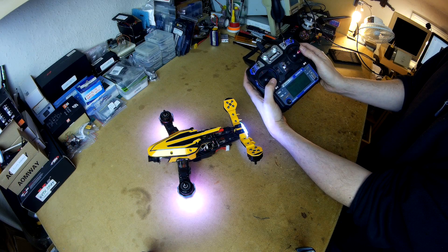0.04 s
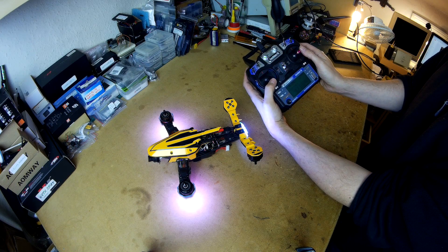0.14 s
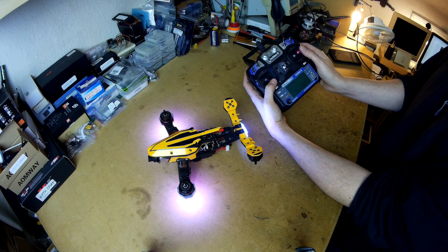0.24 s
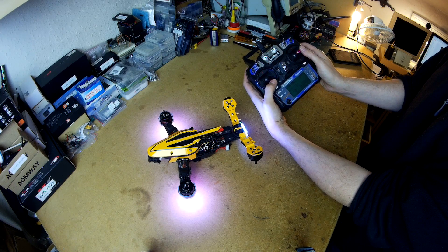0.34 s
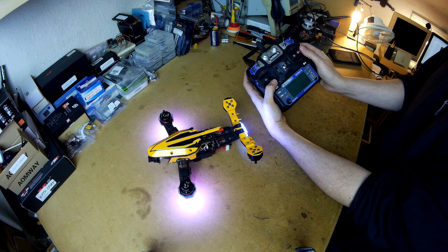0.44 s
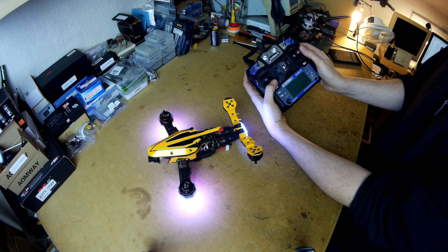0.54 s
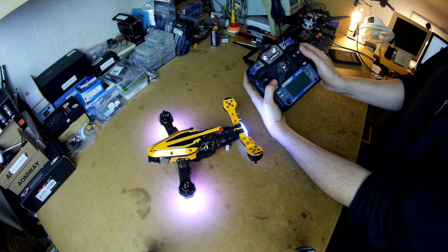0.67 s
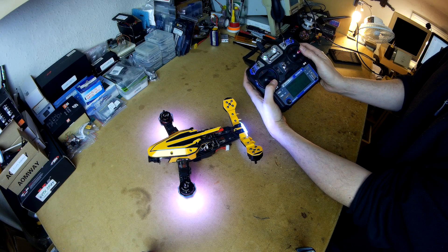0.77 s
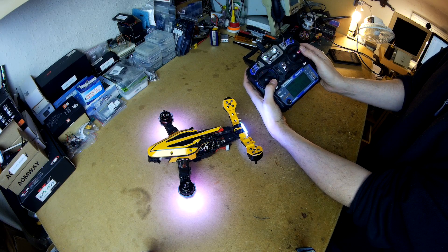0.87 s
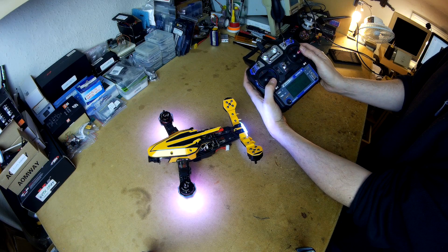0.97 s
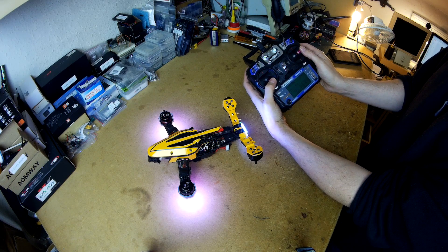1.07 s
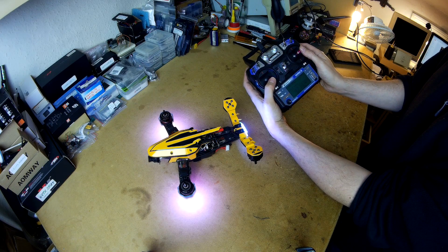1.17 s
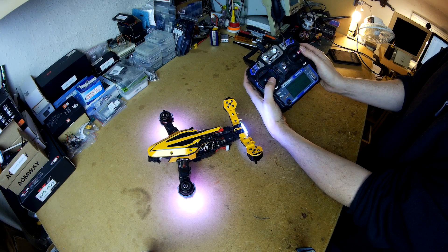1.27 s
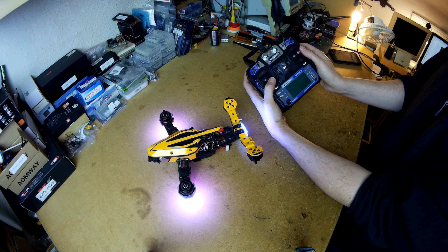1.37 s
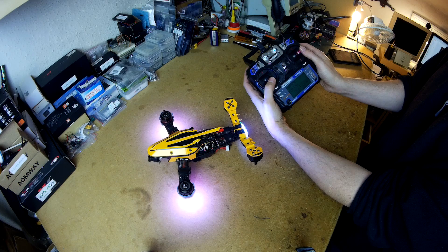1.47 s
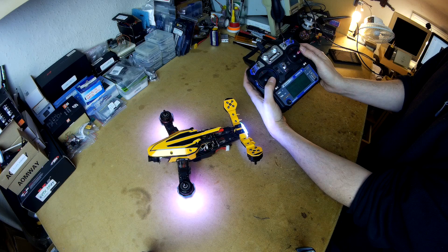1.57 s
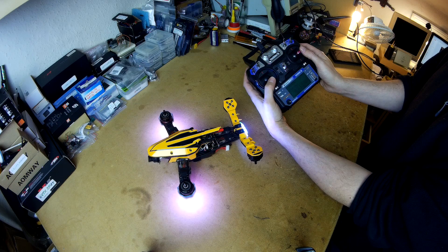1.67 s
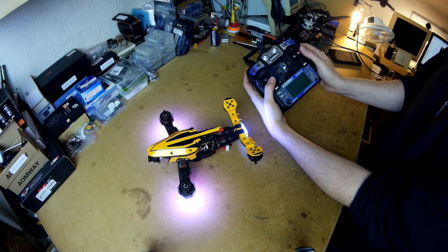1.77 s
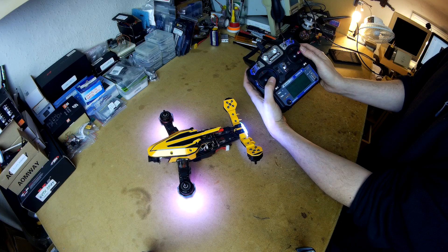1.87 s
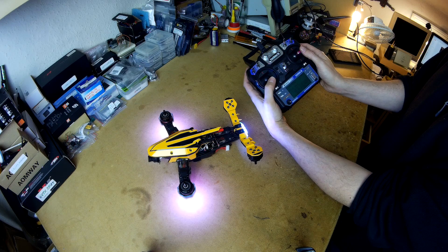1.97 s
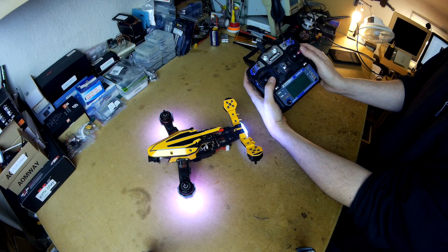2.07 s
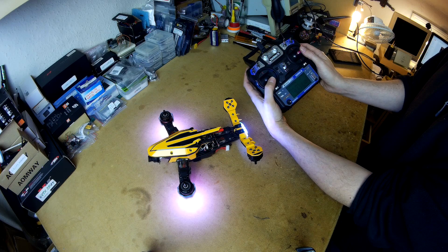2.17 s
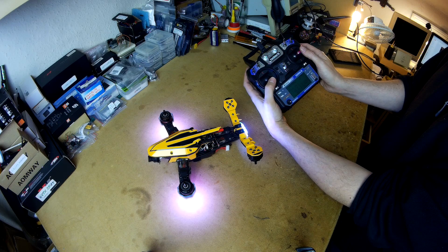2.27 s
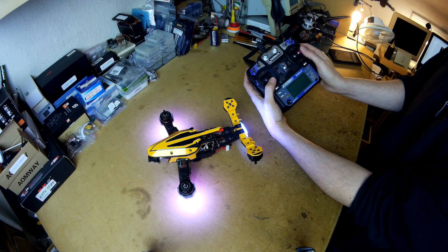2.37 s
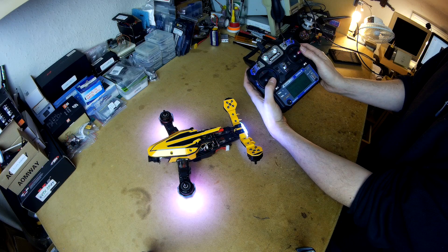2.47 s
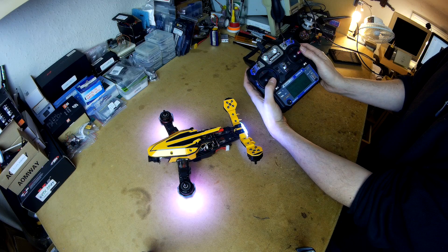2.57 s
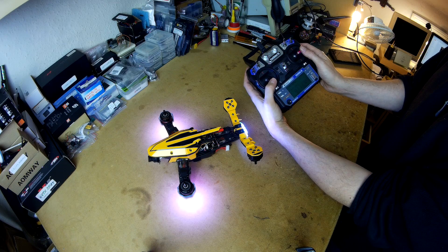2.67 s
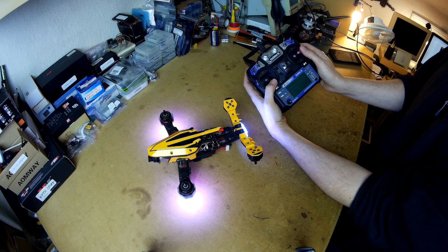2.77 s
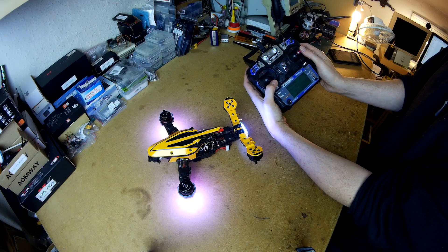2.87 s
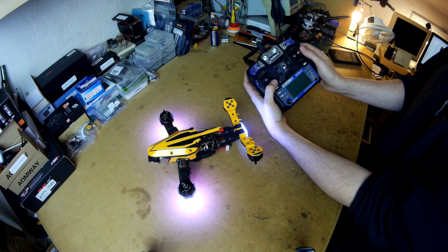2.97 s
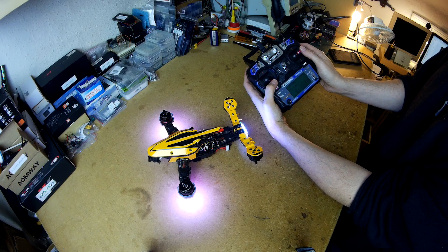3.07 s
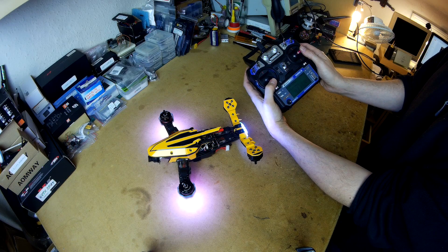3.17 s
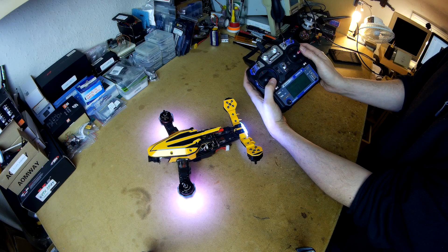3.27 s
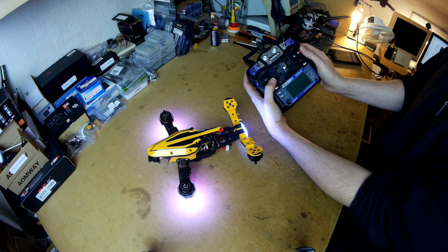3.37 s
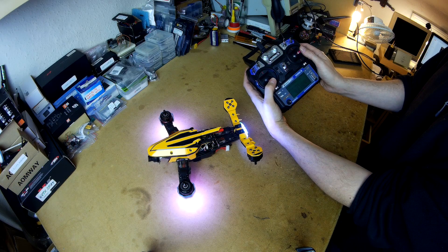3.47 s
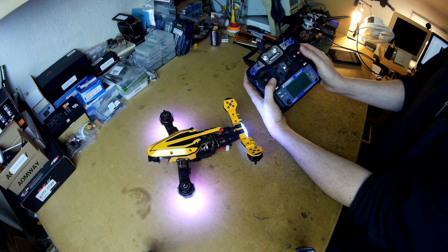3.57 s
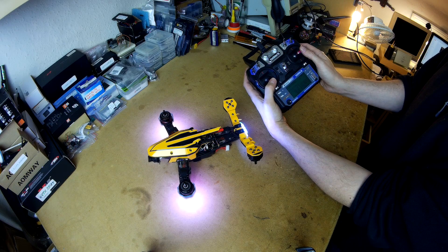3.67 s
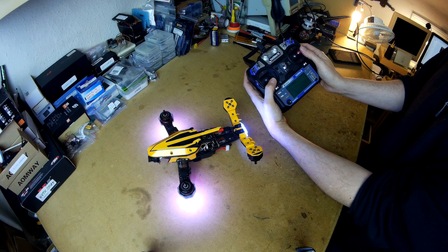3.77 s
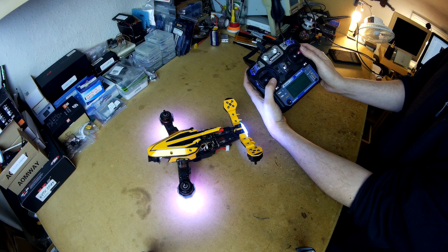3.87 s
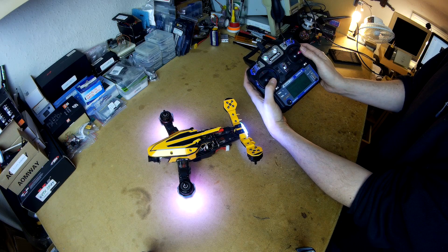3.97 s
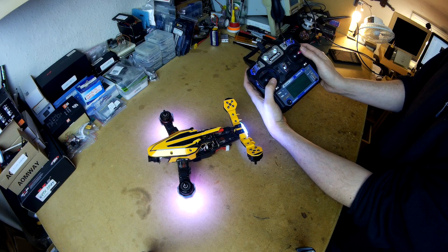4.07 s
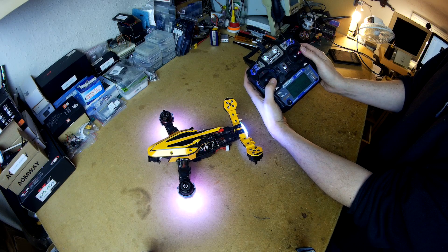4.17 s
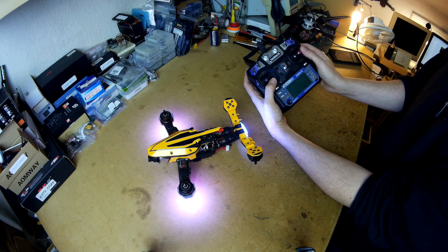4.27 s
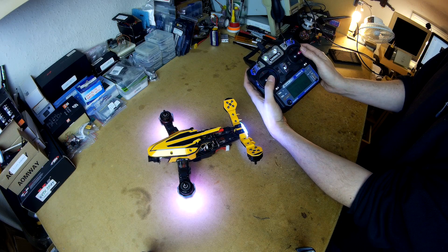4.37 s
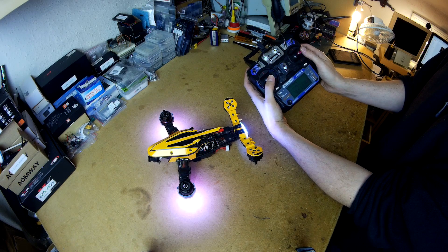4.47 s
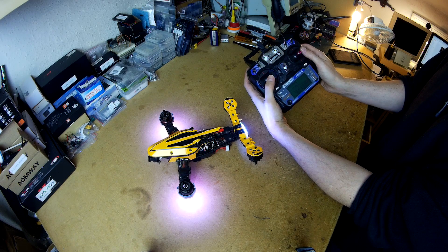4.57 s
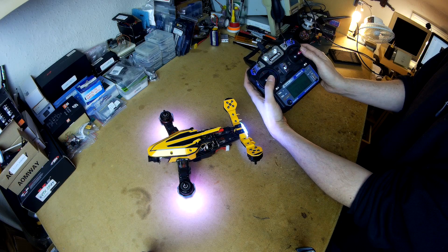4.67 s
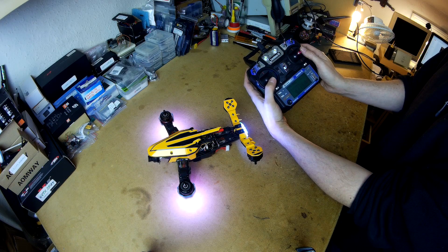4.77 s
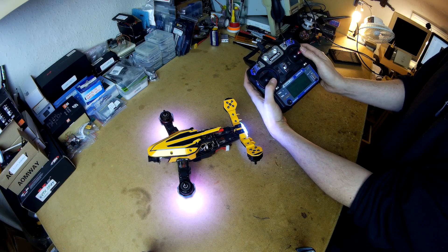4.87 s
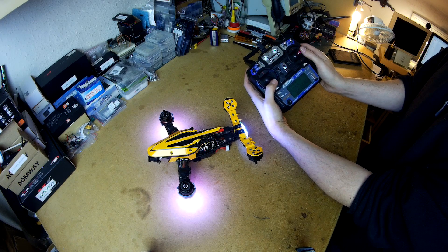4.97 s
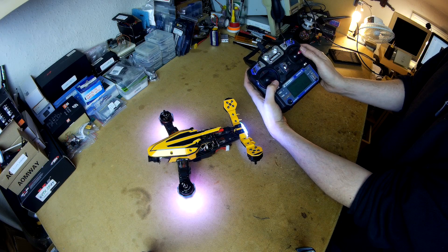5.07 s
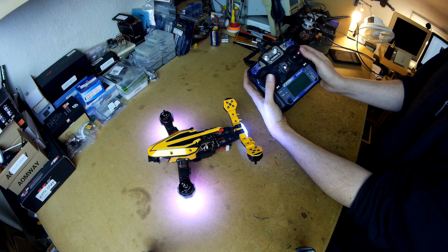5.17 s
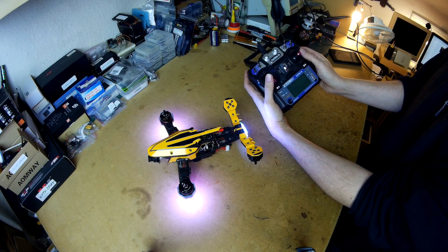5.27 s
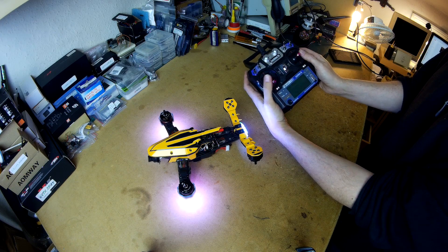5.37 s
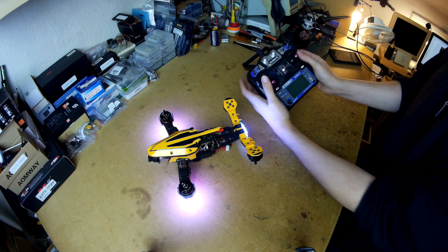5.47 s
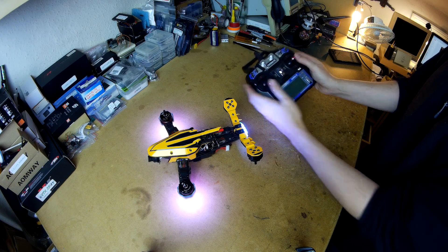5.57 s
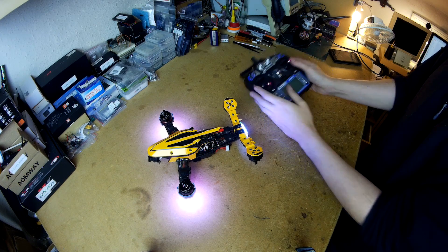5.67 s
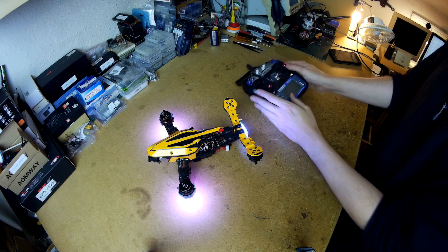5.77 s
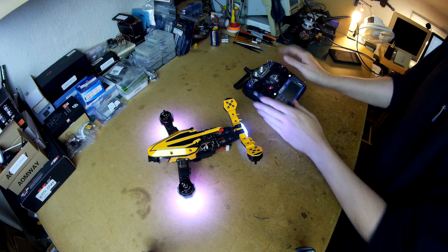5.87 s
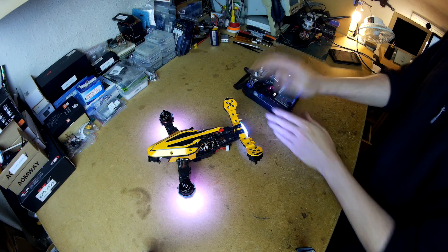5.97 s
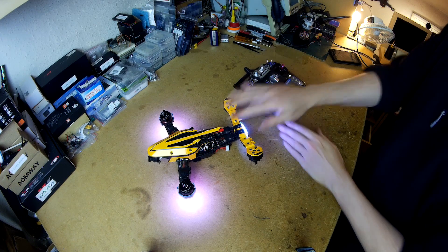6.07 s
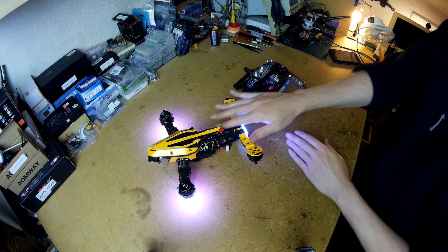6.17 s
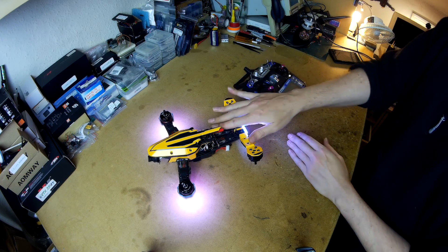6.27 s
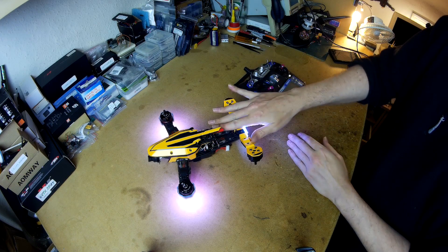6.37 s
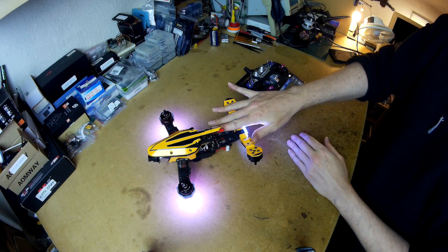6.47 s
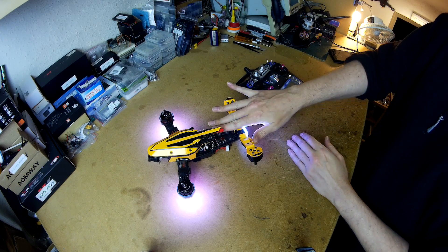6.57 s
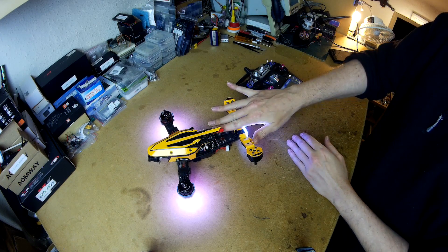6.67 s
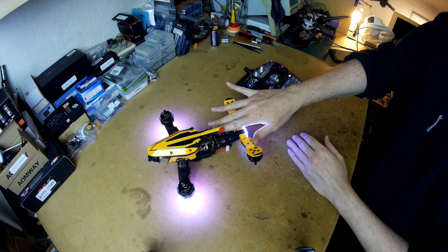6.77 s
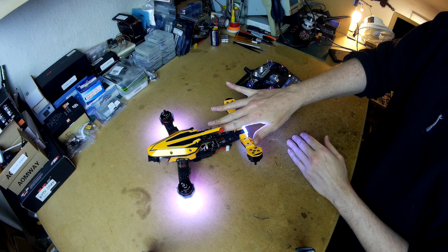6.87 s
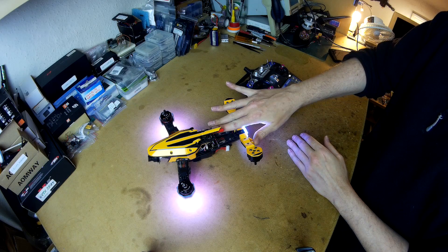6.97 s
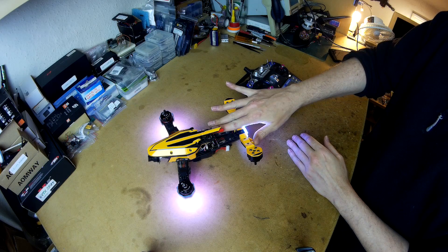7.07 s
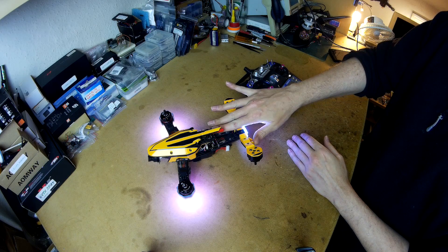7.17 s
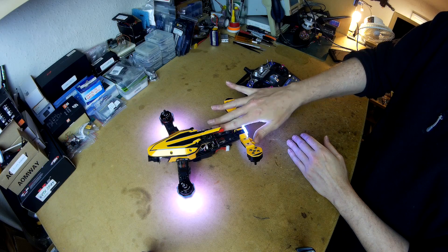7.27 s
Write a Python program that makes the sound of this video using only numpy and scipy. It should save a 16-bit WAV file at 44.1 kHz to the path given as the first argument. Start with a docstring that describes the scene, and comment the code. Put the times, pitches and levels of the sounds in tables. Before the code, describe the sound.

Small drone motors without propellers give a high, hissy whine that ends at once in a sharp jolt. Twice they restart, stuttering and rattling harshly before catching into a rising whine and stopping abruptly. Then a plastic remote control is put down on the workbench with a few light knocks, and a sleeve rustles faintly. The sound is close, in a small room with short reflections.

```python
"""A smooth high whine ends in a jolt: small brushless drone motors, without propellers, on a workbench.
Twice they restart in jolts, losing step and catching again, then whine and stop with one last jolt.
Magnetic forces give tones locked to the rotation; current surges and bearing hiss excite the resonances
of motor bells, frame and arms. Then a plastic remote control is put down, and a sleeve rustles.
The cluttered room adds short reflections; the recorder overloads on jolts and its zero line jumps."""
import sys
import numpy as np
from scipy import signal
from scipy.fft import rfft, irfft, next_fast_len
from scipy.io import wavfile

SR = 44100
rng = np.random.default_rng(int(sys.argv[2]) if len(sys.argv) > 2 else 0)


def transcribe(signal):
    """Save signal, clipped to [-1, 1], as a 16-bit WAV file at the path in sys.argv[1]."""
    frames = np.atleast_2d(signal).T
    limited = np.clip(frames, -1, 1)
    pcm = np.round(limited * 32767).astype(np.int16)
    wavfile.write(sys.argv[1], SR, pcm)


N = 323245

# Levels are relative; a spectrum lists spectral density.
# input noise spectrum: f/Hz, level/dB
INPUT_NOISE = [(24, -29), (40, -0.5), (54, -2.5), (114, -4), (484, -12.5), (972, -16.5), (1070, -17.5),
               (2440, -22.5), (10100, -28.5), (14000, -31.5), (15400, -36)]
# zero-line jumps while the motors rest: sag t/s, drop t/s, leap t/s
JUMP_TIMES = [(0.512, .692, .75), (0.901, 1.028, 1.103), (3.078, 3.264, 3.299), (5.28, 5.48, 5.54),
              (6.058, 6.252, 6.318), (6.429, 6.593, 6.661), (6.779, 6.912, 6.982), (7.099, 7.236, 7.288)]
# their steps: sag, drop, leap, each as amplitude/full scale
JUMP_STEPS = [-0.0041, -0.0065, .0135]
# sleeve envelope: t/s, level/dB
SLEEVE_LEVEL = [(5.6, -68), (5.75, -59), (5.95, -53), (6.1, -58), (6.25, -68)]
# sleeve spectrum: f/Hz, level/dB
SLEEVE_SPECTRUM = [(4000, -7), (7000, -9), (10000, 2), (12500, -10), (15000, -20)]
# impacts of the remote on the bench: t/s, level/dB, crack level/dB re the impact
IMPACTS = [(5.591, -18.5, -7.5), (5.63, -31, -23), (5.737, -24.5, -1), (5.76, -27.5, 0.5),
           (5.784, -38.5, -23), (5.809, -33.5, -9), (5.834, -24, 3.5), (5.85, -32.5, -28),
           (5.874, -42, -17)]
# modes of its case: f/Hz, level/dB, T60/s
CASE_MODES = [(470, -11, 0.12), (652, -20, 0.17), (805, -21, 0.069), (954, -3, 0.05), (1236, -16, 0.073),
              (1583, 0, 0.095), (1916, -11.5, 0.11), (3420, -26, 0.043), (3930, -20, 0.035)]
# spectra of its thud and crack: f/Hz, level/dB
THUD_SPECTRUM = [(30, 4), (80, -5), (150, 7), (270, -7), (450, -2), (1500, -3), (2300, -11),
                 (3000, -25), (6000, -24), (9000, -70)]
CRACK_SPECTRUM = [(3000, 0.5), (6000, 1), (10000, 4), (15000, -17)]
# modes of the motor bells, frame and arms: f/Hz, bandwidth/Hz, level/dB
BELL_MODES = [(4720, 110, -21), (4830, 100, -23), (5480, 86, -25), (5300, 180, -22.5), (6200, 55, -25),
              (6570, 29, -19.5), (8170, 430, 2.5), (8770, 210, -2), (8850, 130, 7), (9535, 200, -0.5),
              (10110, 210, -2), (11210, 240, -8), (10310, 62, -7.5), (12100, 33, -23.5), (12130, 74, -30),
              (12700, 36, -21)]
FRAME_MODES = [(1611, 54.4, 0), (1958, 14, -0.5), (2805, 110, -6), (3410, 29, -10.5), (3622, 22, -7),
               (3925, 140, -5.5), (4055, 150, -21.5)]
ARM_MODES = [(1680, 70, -4.5), (2021, 47, -2.5), (2280, 170, -10.5)]
# broadband spectra of the bells, frame and bench: f/Hz, level/dB
BELL_SPECTRUM = [(2350, -42.5), (4000, -35.5), (4770, -12), (6040, -16.5), (7320, -2.5), (7930, 3.5),
                 (8830, -2.5), (10500, -15), (11700, -4), (12700, -27.5), (15400, -31)]
FRAME_SPECTRUM = [(100, -16.5), (400, -18), (900, -17), (1300, -12), (1650, -10.5), (2200, -4.5),
                  (2550, -12), (3000, -20.5), (4200, -2.5), (5000, -26), (7000, -60.5)]
BENCH_SPECTRUM = [(60, -4), (150, 4.5), (400, 14.5), (900, -16.5), (2000, -16), (4000, -62.5)]
# runs: start t/s, stop t/s, hiss level/dB at idle, rise/dB per octave of speed
MOTOR_RUNS = [(0, 0.325, -18, 2.5), (1.172, 2.833, -23, 2), (3.418, 5.061, -22.5, 4)]
# current surges as the drive hunts for the rotor or brakes: t/s, level/dB, duration/s
SURGES = [(0.309, -6.5, 0.028), (1.121, -47.5, 0.025), (1.159, -24.5, 0.032), (1.195, -15.5, 0.025),
          (1.251, -13.5, 0.0066), (1.281, -9, 0.014), (1.309, -7.0, 0.027), (1.368, -5.5, 0.0097),
          (1.426, -6.5, 0.022), (1.49, -8.5, 0.039), (1.557, -7.5, 0.016), (1.609, -8.5, 0.027),
          (1.683, -5.5, 0.018), (1.766, -14, 0.015), (2.829, -7, 0.015), (3.347, -47.5, 0.04),
          (3.387, -25.0, 0.039), (3.441, -11, 0.014), (3.464, -9.5, 0.013), (3.503, -5, 0.024),
          (3.54, -7.5, 0.023), (3.581, -6.5, 0.021), (3.622, -6.5, 0.015), (3.645, -9, 0.02),
          (3.692, -8, 0.029), (3.737, -10, 0.0183), (3.765, -6.5, 0.0096), (3.796, -10.5, 0.01),
          (3.826, -7, 0.027), (3.866, -8, 0.018), (3.906, -2, 0.025), (3.973, -10, 0.021), (4.02, -6, 0.01),
          (4.046, -17, 0.0085), (4.102, -4.5, 0.011), (4.161, -14.5, 0.01), (4.234, -19.5, 0.024),
          (5.055, -5, 0.0071)]
# magnet-pass tone of the loudest motor, one list per smooth run: t/s, f/Hz
SMOOTH_PITCH = [
    [(0, 2736), (.1, 2825), (.31, 2900)],
    [(1.8, 1907), (1.85, 1930), (2.08, 2262), (2.2, 2405), (2.4, 2808), (2.55, 2940), (2.83, 3332)],
    [(4.2, 1764), (4.31, 1863), (4.424, 2000), (4.475, 3020), (4.52, 3460), (4.66, 3620), (4.765, 3550),
     (4.85, 2817), (5.05, 2810)],
]
# the same tone, one list per jolting start: t/s, coasting f/Hz, fully pulled-up f/Hz
START_PITCH = [
    [(1.16, 1100, 2250), (1.42, 1120, 2280), (1.76, 1780, 2200)],
    [(3.39, 1200, 2250), (3.6, 1550, 2280), (4.0, 1580, 2250), (4.16, 1620, 1900)],
]
# rotor orders: cycles per turn, level/dB re the magnet-pass tone at idle, rise/dB per octave of speed
ROTOR_ORDERS = [(14, 0, 0), (13, -13, 7), (15, -11, -4), (16, -13, -8), (8, -23, 12)]
# other motors, relative to the loudest: speed ratio, level/dB
NEIGHBOURS = [(.975, -11), (1.03, -13)]
# transfer of rotor tones through arms and bells: f/Hz, level/dB
TRANSFER = [(600, -80), (1100, -52.5), (1300, -31.5), (1450, -36.5), (1620, -25), (1760, -33.5),
            (1970, -19.5), (2120, -26.5), (2380, -29.5), (2520, -46), (2880, -47), (3030, -35), (3350, -33),
            (3580, -30), (3900, -37), (5500, -57), (7500, -45), (8500, -25), (9300, -30), (10800, -36)]
# glides of the switching drive and other motors: start t/s, end t/s, start f/Hz, end f/Hz, level/dB
DRIVE_GLIDES = [(0, .12, 4130, 4200, -30), (.13, .3, 4200, 4220, -30), (2.5, 2.78, 870, 965, -52),
                (0, .25, 11000, 12200, -31), (1.95, 2.45, 5600, 7200, -43), (1.8, 2.27, 9400, 11600, -38),
                (2.15, 2.83, 15200, 12650, -50), (2.3, 2.83, 10500, 7600, -34),
                (4.5, 4.72, 12200, 11700, -40), (4.6, 5.04, 14650, 14720, -48),
                (4.83, 5.04, 8000, 8450, -27)]

MAGNETS, IDLE_HZ = 14, 1900   # magnet passes per turn, and their rate at idle


def from_db(db):
    """Amplitude ratio of a level in decibels."""
    return 10 ** (np.asarray(db) / 20)


def unit_rms(x):
    """The signal normalised to rms 1."""
    return x / np.sqrt(np.mean(x ** 2) + 1e-20)


def curves(rows):
    """Linear interpolation of each column over the times in the first."""
    times, *columns = np.transpose(rows)
    return [np.interp(np.arange(N) / SR, times, column) for column in columns]


def gate(start, end, edge_s):
    """Trapezoidal window that opens at start (already open if that is 0) and closes after end."""
    t = np.arange(N) / SR
    return np.clip(np.minimum(t - start + edge_s * (start <= 0), end + edge_s - t) / edge_s, 0, 1)


def drift(rate_hz):
    """Random fluctuation of rms 1: noise through a two-pole low-pass."""
    r = np.exp(-2 * np.pi * rate_hz / SR)
    return unit_rms(signal.lfilter([1], [1, -2 * r, r * r], rng.standard_normal(N + SR))[SR:])


def coloured(spectrum):
    """Stationary noise of rms 1, by spectral shaping of white noise."""
    hz, level_db = np.transpose(spectrum)
    size = next_fast_len(N)
    log_hz = np.log(np.arange(size // 2 + 1) * SR / size + 1)
    shape = from_db(np.interp(log_hz, np.log(hz), level_db, left=-90))
    return unit_rms(irfft(rfft(rng.standard_normal(size)) * shape, size)[:N])


def zero_line(coupling_hz=1.6, smoothing=.8):
    """Step response of the input coupling: each jump of the zero line decays exponentially."""
    steps = np.zeros(N)
    steps[np.round(np.array(JUMP_TIMES) * SR).astype(int)] = JUMP_STEPS
    offset = signal.lfilter([1], [1, -np.exp(-2 * np.pi * coupling_hz / SR)], steps)
    return signal.lfilter([1 - smoothing], [1, -smoothing], offset)


def room(x, t60_s=0.15, level_db=-9):
    """Reverberation: dense reflections from bench and boxes form an exponentially decaying tail."""
    t = np.arange(SR // 3) / SR
    tail = rng.standard_normal(len(t)) * from_db(-60 * t / t60_s) * np.clip(t / 0.0056, 0, 1)
    return from_db(level_db) * signal.fftconvolve(x, tail / np.sqrt(np.sum(tail ** 2)))[:N]


def sleeve():
    """Friction noise of a sleeve passing over the bench."""
    return from_db(curves(SLEEVE_LEVEL)[0]) * gate(5.6, 6.25, .02) * coloured(SLEEVE_SPECTRUM)


def remote(hand_t60_s=.075, thud_t60_s=0.11, crack_t60_s=0.037):
    """Impact excitation: each touch cracks, thuds in the bench and rings the hand-damped case."""
    t, out = np.arange(SR // 4) / SR, np.zeros(N)
    thud_noise, crack_noise = coloured(THUD_SPECTRUM), coloured(CRACK_SPECTRUM)
    scatter_db = rng.normal(0, 4.8, (len(IMPACTS), len(CASE_MODES)))
    for (start, db, crack_db), offsets_db in zip(IMPACTS, scatter_db):
        at = slice(round(start * SR), round(start * SR) + len(t))
        case = sum(from_db(mode_db + offset - 60 * t / min(t60, hand_t60_s)) * np.sin(2 * np.pi * hz * t)
                   for (hz, mode_db, t60), offset in zip(CASE_MODES, offsets_db))
        thud = from_db(-3 - 60 * t / thud_t60_s) * thud_noise[at]
        crack = from_db(crack_db - 1.5 - 60 * t / crack_t60_s) * crack_noise[at]
        out[at] += from_db(db) * np.clip(t / 0.0035, .4, 1) * (from_db(-1.5) * case + thud + crack)
    return out


def brake(hz=1945, db=-13.5, t60_s=0.073):
    """Damped free vibration: the arms ring once each time the rotors lock."""
    ages = [np.maximum(np.arange(N) / SR - stop, 0) for _, stop, *_ in MOTOR_RUNS]
    return sum(np.clip(age / 0.0057, 0, 1) * from_db(db - 60 * age / t60_s)
               * np.sin(2 * np.pi * hz * age) for age in ages)


def rotor_speed():
    """Magnet-pass frequency, proportional to speed, before any jolt; also its octaves above idle."""
    phases = SMOOTH_PITCH[0], START_PITCH[0], SMOOTH_PITCH[1], START_PITCH[1], SMOOTH_PITCH[2]
    hz = curves([row[:2] for phase in phases for row in phase])[0]
    return hz, np.log2(np.maximum(hz / IDLE_HZ, 1))


def hiss_envelope(inrush_db=8, inrush_s=.11):
    """Bearing and winding noise swells at a start, then follows a power law of speed."""
    t = np.arange(N) / SR
    _, octaves = rotor_speed()
    inrush = lambda start: (start > 0) * inrush_db * np.exp(-np.maximum(t - start, 0) / inrush_s)
    return sum(gate(start, stop, 0.031) * from_db(db + rise_db * octaves + inrush(start))
               for start, stop, db, rise_db in MOTOR_RUNS)


def structure(envelope, modes, spectrum, broadband_db):
    """Modal superposition: a random force drives resonators, beside noise that follows it at once."""
    def resonate(force):
        response = 0
        for k, (hz, width, db) in enumerate(modes):
            r, angle = np.exp(-np.pi * width / SR), 2 * np.pi * hz / SR
            b, a = [(1 - r * r) / 2, 0, (r * r - 1) / 2], [1, -2 * r * np.cos(angle), r * r]
            response += (-1) ** k * from_db(db) * signal.lfilter(b, a, force)
        return response

    noise = rng.standard_normal(N)
    ringing = resonate(noise * envelope + 1e-18) / np.std(resonate(noise[:SR]))
    return ringing + from_db(broadband_db) * envelope * coloured(spectrum)


def jolts(rise_s=0.0017, fall_s=0.0067, bite_db=6, bite_s=0.0018, coast_s=.034):
    """Torque pulses from current surges: their force envelope and their pull on rotor speed (0-1)."""
    t, force, pull = np.arange(SR // 3) / SR, np.zeros(N), np.zeros(N)
    for start, db, held_s in SURGES:
        at = slice(round(start * SR), round(start * SR) + len(t))
        attack = from_db(db + bite_db * np.exp(-t / bite_s)) * np.clip(t / rise_s, 0, 1)
        force[at] += attack * np.exp(-np.maximum(t - held_s + fall_s / 2, 0) / fall_s)
        spin_up = np.clip(t / .006, 0, 1) * np.clip(1 + (db + 8) / 30, 0, 1)
        coasting = np.exp(-np.maximum(t - held_s / 2, 0) / coast_s)
        pull[at] = np.maximum(pull[at], spin_up * coasting)
    return force * from_db(2 * drift(60)), pull


def whine(pull, waver_db=2.2, hum_db=-51):
    """Forced vibration at multiples of the rotation rate; random modulation broadens the treble lines."""
    hz, octaves = rotor_speed()
    hunting = sum(gate(rows[0][0], rows[-1][0] + .04, .02) for rows in START_PITCH)
    pulled_hz = curves(START_PITCH[0] + START_PITCH[1])[1]
    jitter = 1 + (.003 + .01 * hunting) * drift(30)
    rotation_hz = (hz + hunting * pull * (pulled_hz - hz)) * jitter / MAGNETS
    turns = np.cumsum(rotation_hz) / SR
    wavers, blur = [drift(17) for _ in range(4)], drift(110)
    hunting_db = hunting * (-2 + 3 * drift(60))   # weaker and unsteady while the drive hunts

    def tone(cycles, db, voice):
        return np.sqrt(2) * from_db(db + waver_db * wavers[voice % 4]) * np.sin(2 * np.pi * cycles)

    def order(per_turn, db, voice):
        transfer_db = np.interp(per_turn * rotation_hz, *np.transpose(TRANSFER))
        return tone(per_turn * turns, db + hunting_db + transfer_db, voice)

    out = sum(order(per_turn, db + rise_db * octaves, voice)
              for voice, (per_turn, db, rise_db) in enumerate(ROTOR_ORDERS))
    out += sum(drift(40) * order(ratio * MAGNETS, db, voice=3) for ratio, db in NEIGHBOURS)
    # only the first, settled run has a clear third harmonic and a low hum
    settled = gate(*MOTOR_RUNS[0][:2], .01)
    out += (settled + (1 - .7 * settled) * blur) * order(3 * MAGNETS, 0, voice=2)
    out += settled * tone(2 * turns, hum_db, voice=0)
    for voice, (start, end, from_hz, to_hz, db) in enumerate(DRIVE_GLIDES):
        cycles = np.cumsum(curves([(start, from_hz), (end, to_hz)])[0]) / SR
        roughness = 1 + .2 * blur if from_hz < 5000 else blur
        out += gate(start, end, 0.045) * roughness * tone(cycles, db, voice)
    return out * sum(gate(start, stop, 0.023) for start, stop, *_ in MOTOR_RUNS)


def motors():
    """Structure-borne sound: hiss and jolts add in power and shake the parts; the tones ride on top."""
    surge, pull = jolts()
    hiss = hiss_envelope()
    chatter = from_db(0.73 * drift(150))   # bearing balls rattle unevenly
    bells = structure(np.hypot(hiss * chatter, surge), BELL_MODES, BELL_SPECTRUM, broadband_db=-7.5)
    frame_force = np.hypot(from_db(-14.5) * hiss, from_db(-23) * surge)
    frame = structure(frame_force, FRAME_MODES, FRAME_SPECTRUM, broadband_db=-0.82)
    arms_and_bench = structure(from_db(-21) * surge, ARM_MODES, BENCH_SPECTRUM, broadband_db=-20)
    return bells + frame + arms_and_bench + whine(pull) + brake()


def scene():
    """Superposition of the direct sound from the bench, its reflections and the sleeve, in mono."""
    direct = motors() + remote()
    rustle = sleeve()
    return ((direct + room(direct)) * from_db(0.32) + rustle)[None]


def record(dry, noise_db=-54.5, ceiling=.98, stopband_hz=15850):
    """Saturation and band limiting: noise and jumps join, peaks flatten, the top treble is cut."""
    x = dry + from_db(noise_db) * coloured(INPUT_NOISE) + zero_line()
    saturated = x / (1 + np.abs(x / ceiling) ** 10) ** (1 / 10)
    return signal.sosfilt(signal.cheby2(22, 72, stopband_hz, fs=SR, output="sos"), saturated)


dry = scene()
out = record(dry)
transcribe(out)
```